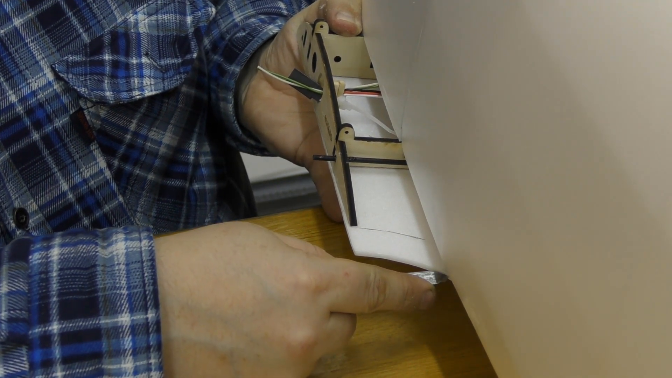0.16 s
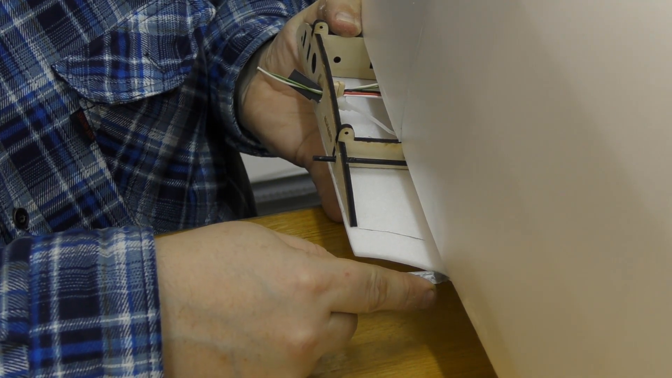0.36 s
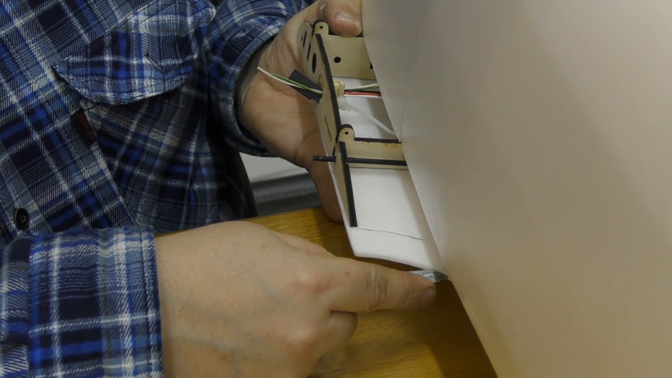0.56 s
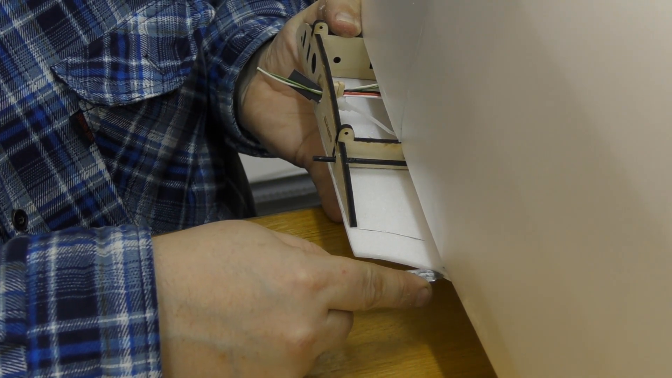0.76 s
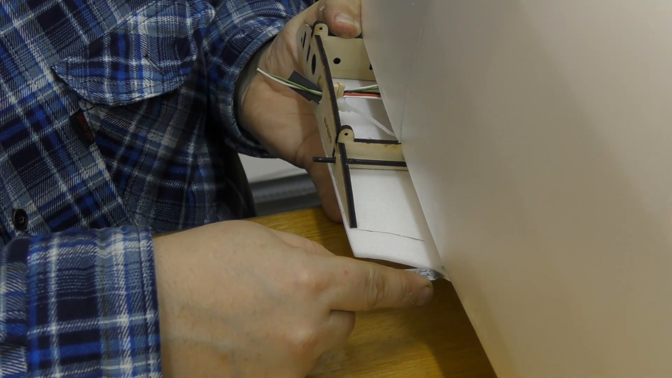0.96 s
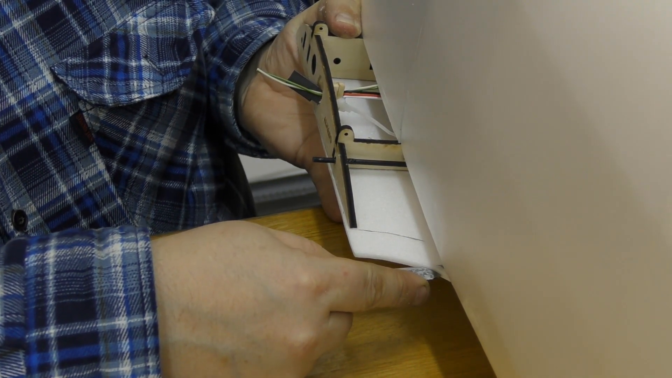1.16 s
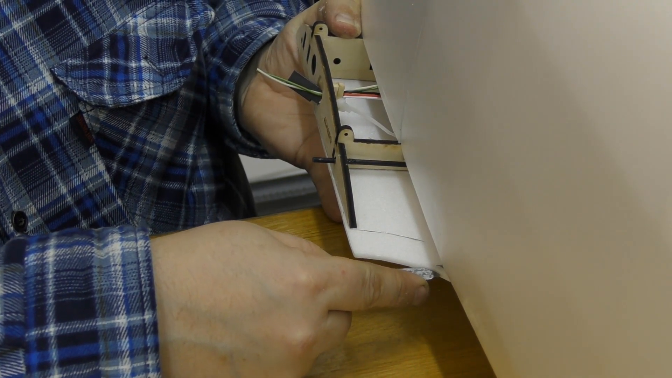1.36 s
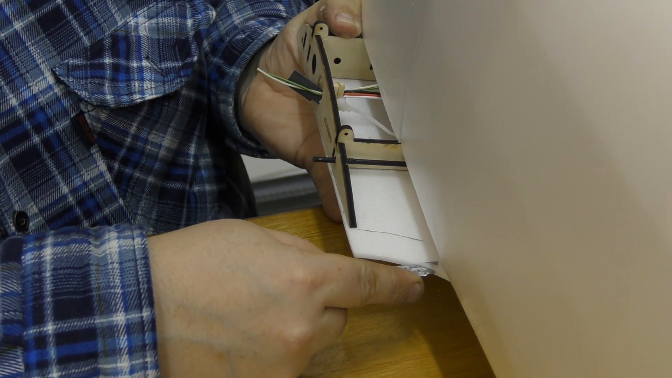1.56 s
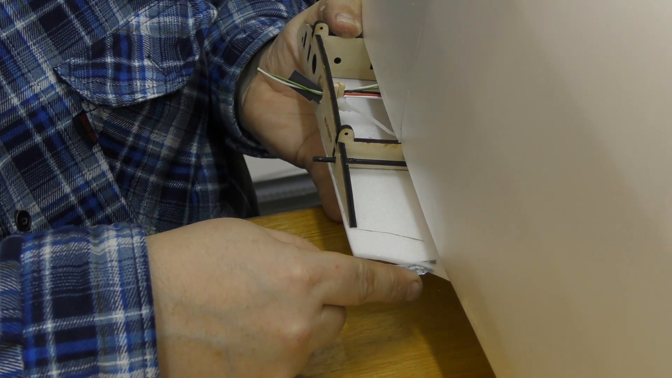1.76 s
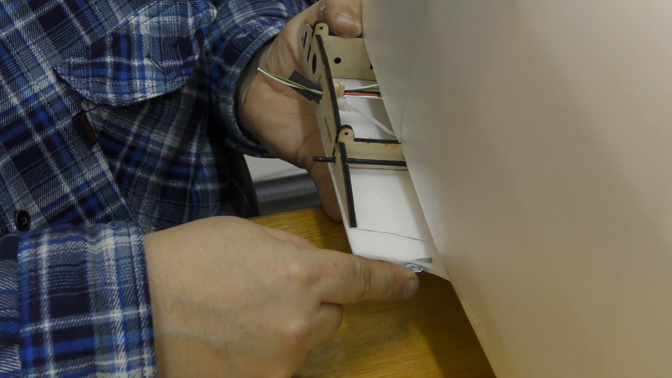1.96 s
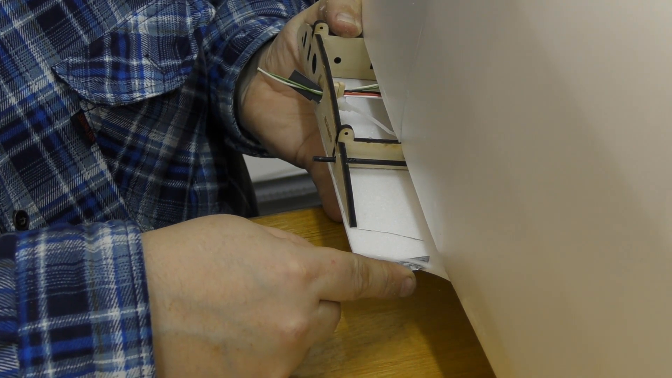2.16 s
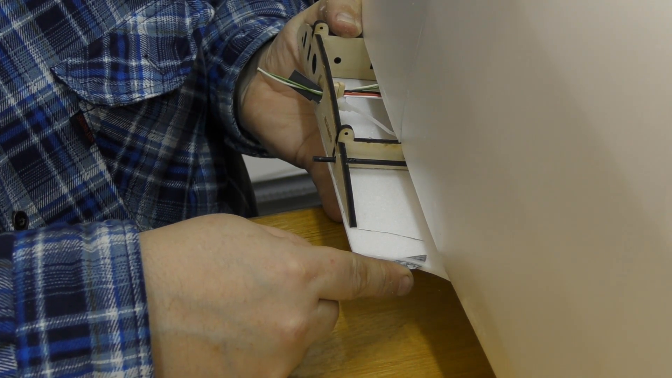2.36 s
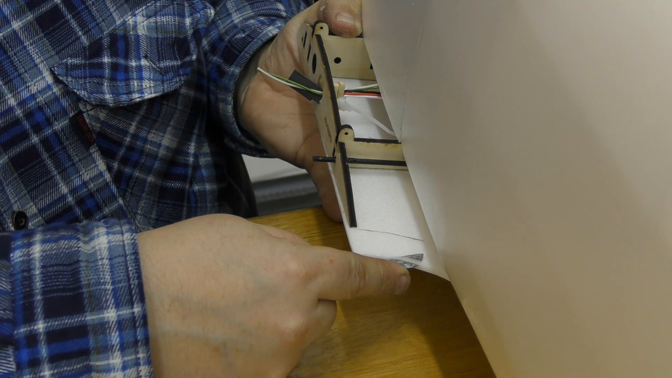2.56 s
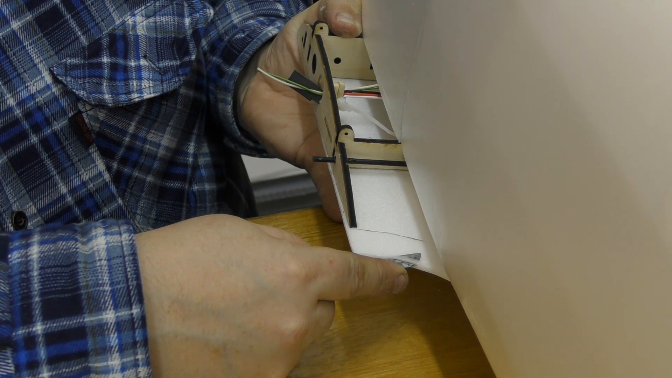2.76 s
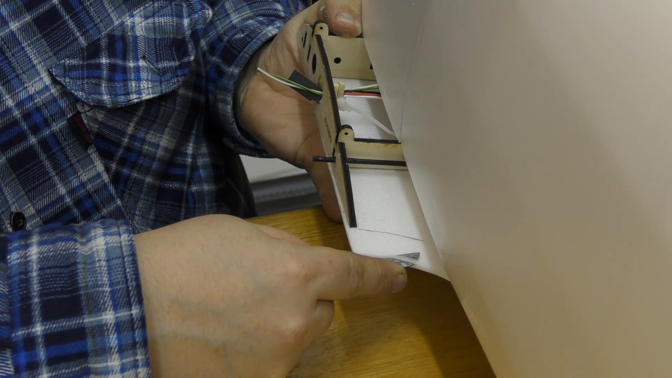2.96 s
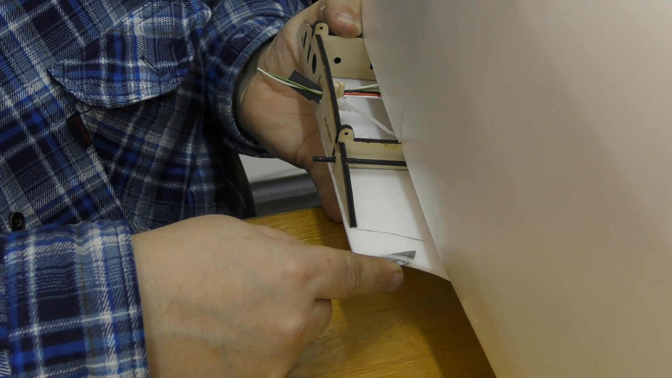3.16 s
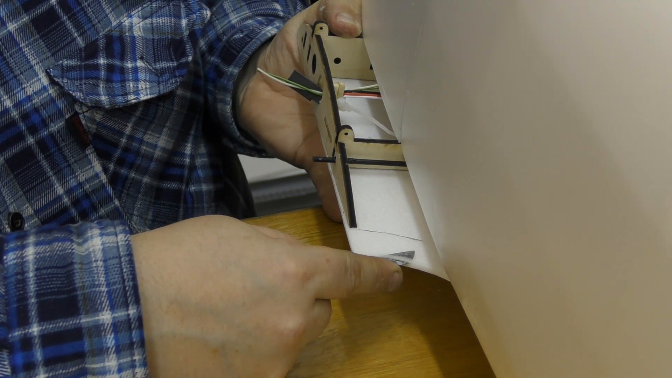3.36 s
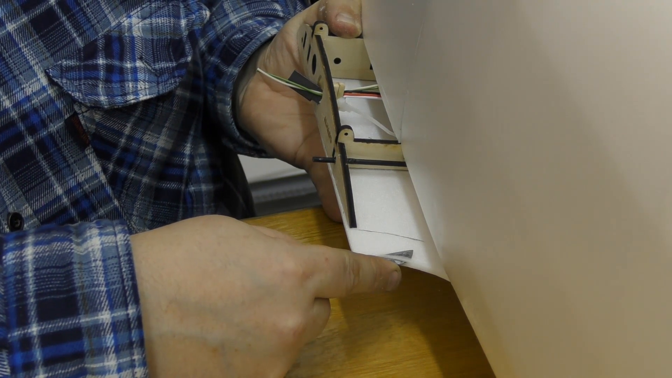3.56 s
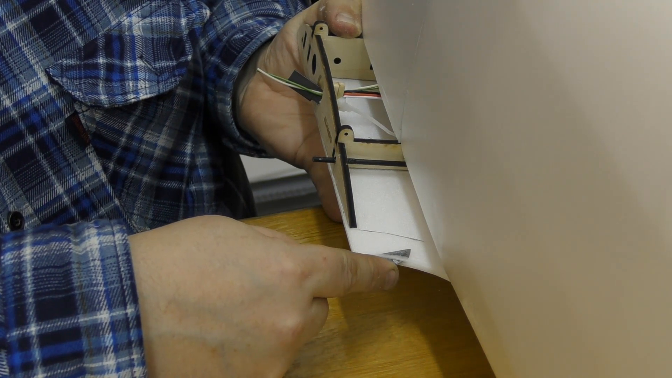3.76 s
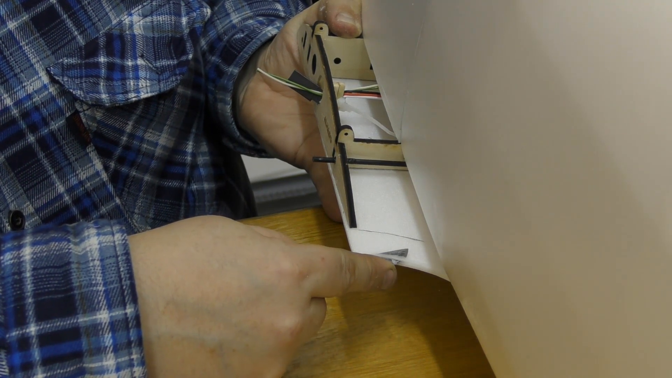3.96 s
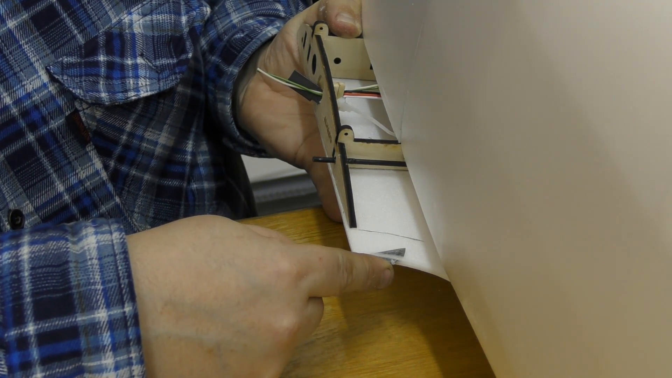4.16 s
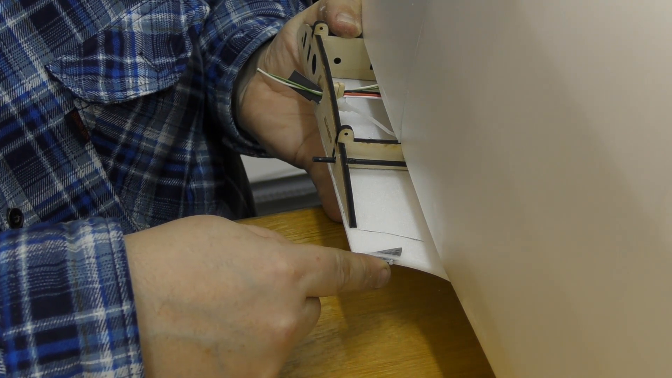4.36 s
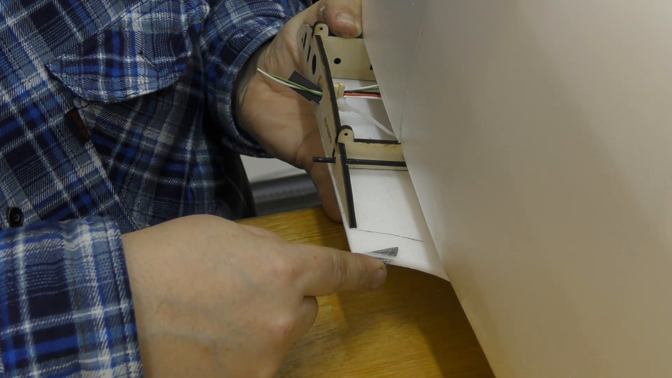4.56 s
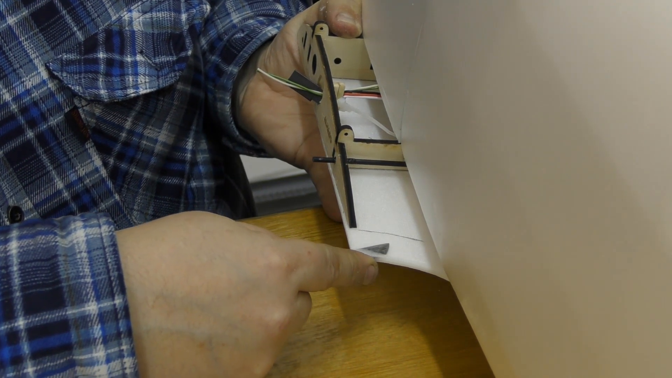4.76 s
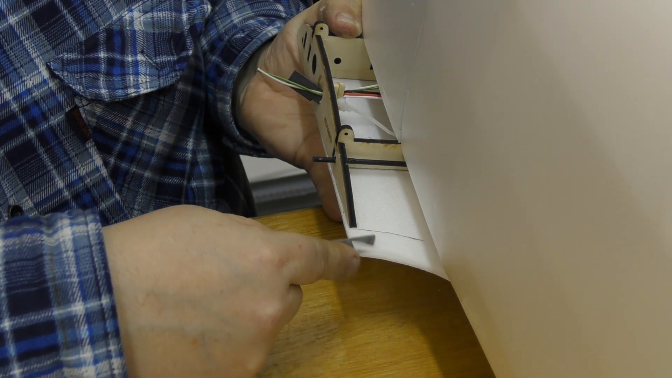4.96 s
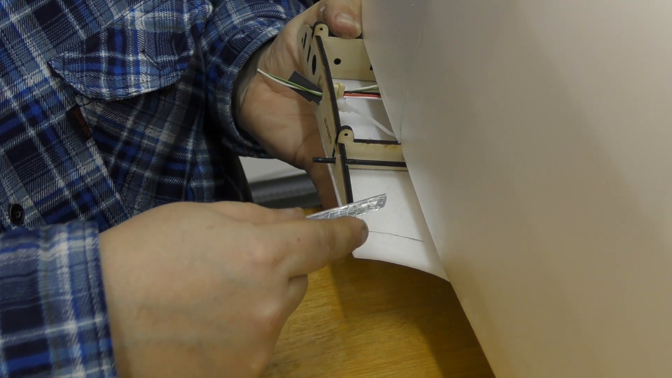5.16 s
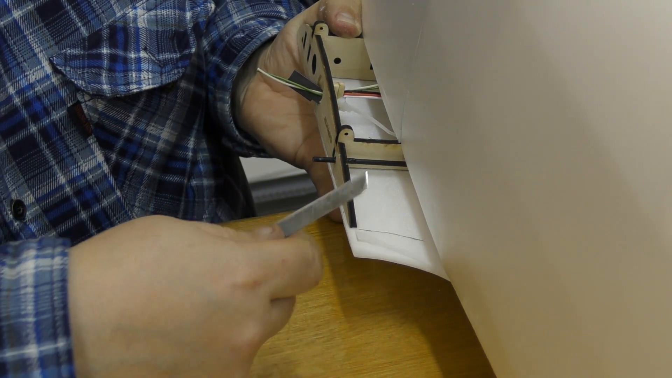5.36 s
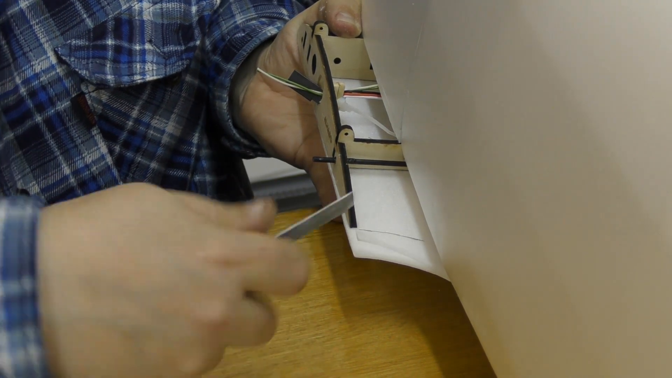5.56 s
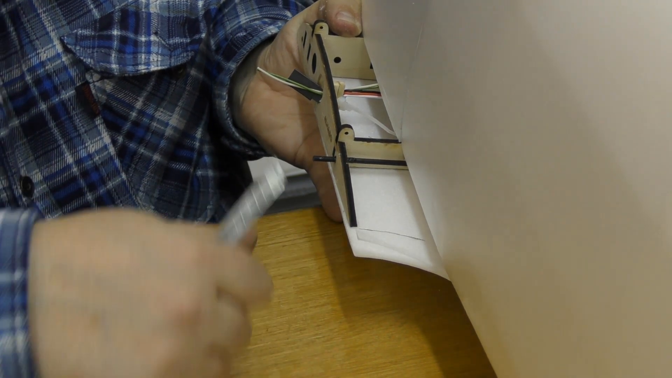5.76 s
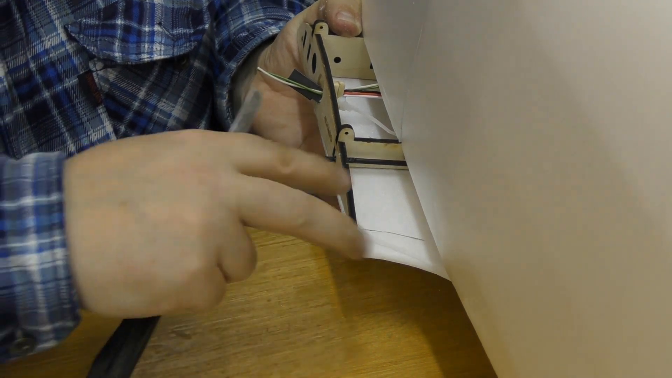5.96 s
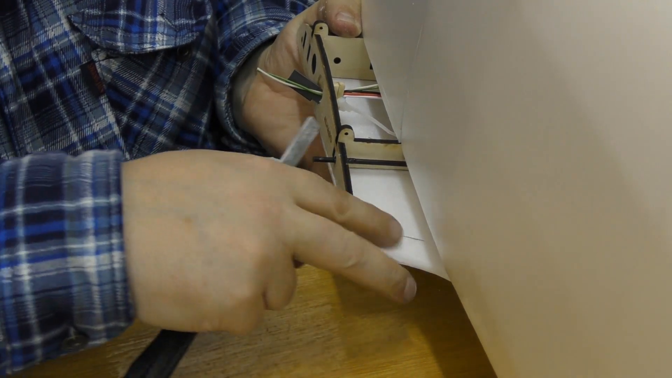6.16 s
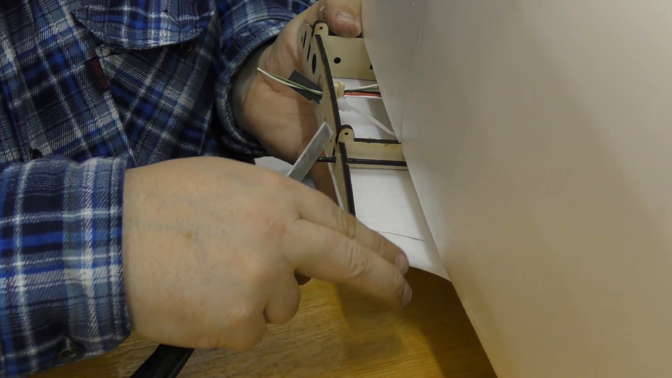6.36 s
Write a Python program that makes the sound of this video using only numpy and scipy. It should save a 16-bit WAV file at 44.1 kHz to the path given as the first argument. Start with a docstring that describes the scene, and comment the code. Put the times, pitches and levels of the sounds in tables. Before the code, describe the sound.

Close up in a quiet, dry indoor room with low rumble and light hiss, a small steel blade slowly trims foam. Faint crunchy pushes and tiny irregular ticks come first, with one sharper woody knock. After a sparse stretch, a brief chattering rasp swells and snaps, then the last strip tears with a very short, bright rip and squeak. Soft low hand bumps and another light knock follow.

```python
"""A small steel blade trims the edge of a foam sheet over a workbench, amid room rumble, a low drone and hiss.
At first it creeps in soft pushes and faint slips: random cell ruptures excite modes of sheet, skin and blade.
Hands add low bumps of filtered noise; two knocks ring a wooden frame; decaying sines ping as the blade springs free.
Late on, the blade runs out in one longer, chattering rasp, with clicks as single cells pop.
Soon after, a dense volley of ruptures rips the last strip, with a short squeak; a few slips and pushes follow."""
import sys
import numpy as np
from scipy import signal
from scipy.fft import rfft, irfft
from scipy.io import wavfile
from scipy.ndimage import uniform_filter1d

SR = 44100
rng = np.random.default_rng(int(sys.argv[2]) if len(sys.argv) > 2 else 0)


def to_wav(sig):
    """Store sig (one row per channel, or 1-D mono) as 16-bit WAV at the path in sys.argv[1].

    Samples outside -1..1 are clipped; the rate is SR.
    """
    pcm = np.clip(np.atleast_2d(sig), -1, 1) * 32767
    pcm = np.round(pcm).astype(np.int16)
    wavfile.write(sys.argv[1], SR, pcm.T)  # frames by channels


N = 283198
TIME = np.arange(N) / SR

# Room rumble and microphone hiss. Each row: frequency in Hz, relative spectral level in dB.
FLOOR_SPECTRUM = [(4.7, -31), (8.0, 5), (55, -8.5), (134, -10), (157, -11), (278, -14), (433, -15.5),
                  (491, -16), (868, -17), (1490, -18.5), (1640, -18.5), (2990, -19), (15500, -20)]
# Faint noise that differs slightly between the two channels. Each row: frequency in Hz, relative spectral level
# in dB.
CHANNEL_NOISE_SPECTRUM = [(20, 3.5), (150, 2.5), (1000, -14.5), (5000, -36), (12000, -19.5), (16000, -37)]
# Low drone of the room. Each row: frequency in Hz, bandwidth in Hz, relative level in dB.
DRONE_MODES = [(49, 9, 0)]
FLOOR_DB, DRONE_DB, CHANNEL_NOISE_DB = -59.5, -70.5, -86.5   # rms levels

# Bending modes of the foam sheet. Each row: frequency in Hz, bandwidth in Hz, relative level in dB before any tilt.
SHEET_MODES = [(300.7, 39, -4), (350.5, 40, -2), (387, 32, -2.5), (452, 62, -8.5), (548.3, 37.3, -0.5),
               (646.5, 30, -3), (764, 58, -4.5), (816, 50, 0.5), (875, 46, -0.5), (1021, 87, -7.5)]
# Short rings of its stiff skin. Each row: frequency in Hz, bandwidth in Hz, relative level in dB before any tilt.
SKIN_MODES = [(1214, 133, -1.5), (1513, 105, -1.5), (1706, 48, 0), (2115, 200, -7.5), (2400, 53, -3.5),
              (2557, 50, -1), (2856, 120, -3.5), (3124, 160, -3.5), (3500, 200, -10)]
# Resonances of the blade in the cut. Each row: frequency in Hz, bandwidth in Hz, relative level in dB before tilt.
BLADE_MODES = [(4140, 730, -10.5), (4994, 120, -0.5), (5310, 120, -1.5), (5790, 220, -0.5), (6380, 310, -4),
               (6900, 200, -2), (7900, 460, -2), (8970, 350, 1.5), (9750, 470, -1), (10800, 700, -3),
               (12140, 900, -5.5), (13200, 800, -8), (15000, 1400, -16.5)]
BLADE_TOP_HZ = 14700   # low-pass corner of the foam's damping

# Slow pushes of blade or fingers along the foam. Each row: hardest moment in seconds, length in seconds,
# peak effort in dB, sheet brightness in dB per octave.
PUSHES = [(0.12, 0.15, -65, -7), (0.485, 0.15, -64, 1), (0.818, .19, -54.5, -5), (1.213, 0.16, -60, -9),
          (1.554, 0.23, -56, -4.5), (1.903, 0.4, -61, -9), (2.074, 0.21, -63, -7), (2.63, 0.24, -65, 0),
          (3.208, 0.16, -57, -7), (3.716, 0.13, -59, -3.5), (4.517, 0.31, -64, -2), (4.89, .24, -58.5, 1),
          (5.025, 0.15, -55, 7), (5.079, .062, -44.5, 10), (5.812, .05, -57, -2), (6.307, .14, -62, 9)]
PUSH_RISE_SHARE = 0.51   # part of a push spent building up
PUSH_FLEX_DB, PUSH_SKIN_DB, PUSH_BLADE_DB = -3.0, -7.5, -7.0   # relative to the effort
REST_DB, REST_FULL_S = -72, 0.37   # effort of the edge resting in the cut; when it is fully there

# Slips of the blade and small touches on the sheet. Each row: start in seconds, level of the blade tick in dB,
# length in seconds, sheet brightness in dB per octave.
SLIPS = [(0.07, -51.5, .003, 5), (0.242, -49.5, 0.0047, 2), (0.578, -54, 0.0028, -1),
         (0.753, -35.5, 0.0058, 11), (0.924, -54.5, 0.0048, 0), (1.176, -50.5, .0025, 0),
         (1.246, -57, 0.0084, -16), (1.495, -53.5, .004, -1), (1.554, -44, 0.0068, -5),
         (2.006, -44, 0.0042, -3.5), (2.022, -48.5, .005, 1), (2.068, -55, 0.0053, -10),
         (2.589, -55.5, .0035, -7), (3.056, -52, .0055, -9), (3.115, -56, .009, -1),
         (3.162, -45.5, 0.0048, -6), (3.222, -51.5, 0.0068, 5), (3.2405, -43.5, 0.0034, -2),
         (3.4, -53.5, .0028, -5), (3.519, -52, 0.0027, -5), (4.499, -52.5, .007, -3),
         (4.6565, -44, .0015, -4), (4.72, -41, 0.0025, -18), (4.757, -39, .0018, 5), (4.767, -41, .0012, 0),
         (4.776, -43, .0013, 1), (4.7935, -28, .0018, 6), (4.799, -34, 0.0022, -9),
         (4.931, -51.5, 0.0047, 1), (5.049, -47, 0.0067, 10), (5.0847, -30.5, 0.0023, 5),
         (5.209, -53, 0.0022, 11), (5.7872, -38.5, 0.0064, -5), (6.322, -60.5, .01, 11)]
TYPICAL_SLIP_S = 0.0046
SLIP_FLEX_DB, SLIP_CRUNCH_DB = -7.5, -8.5   # sheet and skin in a typical slip, relative to the blade tick
FLEX_DB_PER_DOUBLING, CRUNCH_DB_PER_DOUBLING = 4.5, 5   # a longer slip moves more of the sheet
THUD_DB, THUD_BAND_HZ = -14.5, (70, 190)   # each slip jogs the held work: dull thud, relative to the sheet's ring

ROOM_T60_S = 0.16   # time for the echoes to decay by 60 dB

# Soft bumps of the hands on the work. Each row: time in seconds, level in dB before a common trim,
# centre frequency in Hz.
BUMPS = [(0.6, -58, 50), (2.121, -57, 55.4), (3.225, -48, 49.5), (4.801, -46.5, 62), (4.883, -52, 52),
         (4.98, -51, 48), (5.121, -48, 59), (5.24, -54, 40), (5.631, -47.5, 63), (5.81, -51, 75),
         (6.061, -43.5, 36.2)]
BUMP_CYCLES, BUMP_TRIM_DB = 3.3, -3.5   # length in cycles of the centre frequency; common trim

# Sharp knocks that reach the frame. Each row: start in seconds, level in dB, brightness in dB per octave.
KNOCKS = [(0.7542, -41, 5), (5.7879, -43.5, -1)]
# Modes of the light wooden frame. Each row: frequency in Hz, bandwidth in Hz, relative level in dB before tilt.
FRAME_MODES = [(196, 21, -0.5), (347, 25, -5), (467, 15, 0), (897, 29, -6), (1270, 130, 0), (1434, 38, 7.5),
               (1950, 190, -2.5)]
# Thin pings as the blade springs free. Each row: start in seconds, frequency in Hz, starting peak level in dB,
# 60 dB decay time in seconds.
PINGS = [(1.554, 3460, -47.5, 0.047), (2.007, 3436, -54, 0.11), (5.208, 4540, -52, 0.034)]

# The long rasp: effort builds steadily in dB, then gives way.
RASP_PEAK_S, RASP_RISE_DB_PER_S, RASP_FALL_DB_PER_S = 4.80, 118, 257
RASP_FLEX_DB, RASP_SKIN_DB, RASP_BLADE_DB = -43, -51, -42   # before the force flare and effort are applied
RASP_SLOPE_DB = -1   # sheet brightness per octave
RASP_BLADE_FOLLOWS = 1.3   # dB of blade rasp per dB of effort
# Crisp pop of a single cell at the tip. Each row: frequency in Hz, bandwidth in Hz, relative level in dB.
POP_MODES = [(9400, 680, 0), (11900, 2300, -2), (13200, 900, -10)]
POP_DB = -1.5   # relative to the blade rasp

# The last strip rips: the tear runs from the blade into the sheet.
RIP_S, RIP_HOLD_S = 5.0915, 0.017
RIP_RISE_DB_PER_S, RIP_FALL_DB_PER_S, RIP_FLEX_FALL_DB_PER_S = 1154, 1900, 1050
RIP_BLADE_DB, RIP_SKIN_DB, RIP_FLEX_DB = -28, -34, -32   # loudest short-time rms
RIP_SLOPE_DB = 6.5   # sheet brightness per octave
RIP_SKIN_LAG_S, RIP_FLEX_LAG_S = 0.0041, 0.0018
RIP_WEAK_BAND_HZ, RIP_WEAK_DB = (3000, 4500), -6.5   # blade and skin modes in this band ring less

SQUEAK_S, SQUEAK_LENGTH_S, SQUEAK_HZ, SQUEAK_DB = 5.0915, 0.013, 813, -24.5
CUTOFF_HZ = 15850


def from_db(db):
    """Amplitude ratio: 20 dB per factor of ten."""
    return 10 ** (np.asarray(db) / 20)


def rms_one(x):
    """Normalise to unit root mean square."""
    return x / np.sqrt(np.mean(x ** 2) + 1e-20)


def crest_one(x, window_s):
    """Normalise a short sound so that its loudest moment has unit short-time rms."""
    power = uniform_filter1d(x * x, max(2, int(window_s * SR)))
    return x / np.sqrt(power.max() + 1e-20)


def add(track, s, sound):
    """Superpose a sound on the track at time s."""
    start = max(0, round(s * SR))
    track[start:start + len(sound)] += sound[:N - start]


def swell(length_s):
    """Times and heights of a sine-squared window: one smooth rise and fall."""
    t = np.arange(int(length_s * SR)) / SR
    return t, np.sin(np.pi * t / length_s) ** 2


def filtered(x, order, hz, kind):
    """Butterworth filtering: a maximally flat passband."""
    return signal.sosfilt(signal.butter(order, hz, kind, fs=SR, output="sos"), x)


def resonate(force, modes):
    """Modal superposition: parallel two-pole resonances with alternating signs."""
    out = 0
    for k, (hz, width, db) in enumerate(modes):
        radius = np.exp(-np.pi * abs(width) / SR)   # a wider resonance decays sooner
        poles = [1, -2 * radius * np.cos(2 * np.pi * hz / SR), radius * radius]
        gain = (-1) ** k * from_db(db) * (1 - radius * radius) / 2
        out = out + gain * signal.lfilter([1, 0, -1], poles, force + 1e-18)
    return out


def tilted(modes, slope_db, top_hz):
    """Selective excitation: the edge's bearing decides whether low modes or those from top_hz up answer."""
    return [(hz, width, db + slope_db * np.log2(min(hz / top_hz, 1))) for hz, width, db in modes]


def coloured_noise(spectrum):
    """Spectral shaping: white noise weighted along log frequency, at unit rms."""
    hz = np.maximum(np.arange(N // 2 + 1) * SR / N, 1)
    points_hz, points_db = np.transpose(spectrum)
    weights_db = np.interp(np.log(hz), np.log(points_hz), points_db)
    return rms_one(irfft(rfft(rng.standard_normal(N)) * from_db(weights_db), N))


def background():
    """Stationary noise: smooth rumble and hiss, with a narrow noise band as a wavering drone."""
    drone = rms_one(resonate(rng.standard_normal(N), DRONE_MODES))
    return from_db(FLOOR_DB) * coloured_noise(FLOOR_SPECTRUM) + from_db(DRONE_DB) * drone


def channel_noise():
    """Incoherent noise: each channel draws its own faint noise, so the two sides differ slightly."""
    return from_db(CHANNEL_NOISE_DB) * np.array([coloured_noise(CHANNEL_NOISE_SPECTRUM) for channel in range(2)])


def snaps(count, per_s, spread_db):
    """Random impulse excitation: foam cells break at random moments with uneven force and either sign."""
    sizes = from_db(spread_db * np.minimum(rng.exponential(1, count), 4)) * rng.choice([-1, 1], count)
    return sizes * (rng.random(count) < per_s / SR)


def sheet(force, slope_db):
    """Weak radiation below the lowest mode: the sheet's modes pass a high-pass filter."""
    ringing = resonate(force, tilted(SHEET_MODES, slope_db, top_hz=800))
    return filtered(ringing, 5, 280, "high")


def blade(force, slope_db):
    """Damping: the foam around the edge softens the blade's highest rings."""
    ringing = resonate(force, tilted(BLADE_MODES, slope_db, top_hz=11000))
    return filtered(ringing, 1, BLADE_TOP_HZ, "low")


def drag():
    """Continuous fracture: between slips the edge tears fine cells; each push swells and relaxes."""
    # the edge settles into the cut and rests there until the strip rips
    effort = from_db(REST_DB) * np.interp(TIME, [0, REST_FULL_S], [0, 1]) * (TIME < RIP_S)
    for s, length_s, db, _ in PUSHES:
        start_s = s - PUSH_RISE_SHARE * length_s
        triangle = np.interp(TIME, [start_s, s, start_s + length_s], [0, 1, 0])
        effort = effort + from_db(db) * triangle ** 1.26
    s, _, _, slopes_db = np.transpose(PUSHES)
    bright = np.clip(0.5 + np.interp(TIME, s, slopes_db) / 18, 0, 1)   # share of the bright bearing point
    force = snaps(N, per_s=2200, spread_db=3.8)
    dull_flex = rms_one(sheet(force, slope_db=-7.5))
    bright_flex = rms_one(sheet(force, slope_db=10))
    flex = from_db(PUSH_FLEX_DB) * (dull_flex * (1 - bright) + bright_flex * bright)
    crunch = from_db(PUSH_SKIN_DB) * rms_one(resonate(force, SKIN_MODES))
    steel = from_db(PUSH_BLADE_DB) * rms_one(blade(force, slope_db=1.0))
    return effort * (flex + crunch + steel)


def slip_force(count, length_s, first_snap):
    """Impulse and aftershocks: a firm snap sets off a dying volley, which outweighs it in a long slip."""
    decay = np.exp(-(np.arange(count) / SR / length_s) ** 2)
    force = snaps(count, per_s=14000, spread_db=2.0) * decay
    force[0] = first_snap
    return force


def slips():
    """Common excitation: the edge jumps and strikes sheet, skin and blade; short jumps ring the blade brightest."""
    out, count = np.zeros(N), SR // 7
    for s, db, length_s, slope_db in SLIPS:
        doublings = np.log2(length_s / TYPICAL_SLIP_S)
        flex_db = db + SLIP_FLEX_DB + FLEX_DB_PER_DOUBLING * doublings
        crunch_db = db + SLIP_CRUNCH_DB + CRUNCH_DB_PER_DOUBLING * doublings
        blade_slope_db = 3.0 * np.log2(0.007 / length_s)
        jolt = slip_force(count, length_s, first_snap=8.0)     # the sheet feels mostly the first jolt
        volley = slip_force(count, length_s, first_snap=5.0)   # the edge feels every cell
        flex = from_db(flex_db) * crest_one(sheet(jolt, slope_db), window_s=0.01)
        crunch = from_db(crunch_db) * crest_one(resonate(jolt, SKIN_MODES), window_s=0.00385)
        tick = from_db(db) * crest_one(blade(volley, blade_slope_db), window_s=0.00098)
        thud = from_db(flex_db + THUD_DB) * crest_one(filtered(jolt, 2, THUD_BAND_HZ, "band"), window_s=0.01)
        add(out, s, flex + crunch + tick + thud)
    return out


def room(x, wet_db, dull_hz, delay_s):
    """Reverberation: bench and walls return decaying, low-passed echoes, by convolution."""
    t = np.arange(SR // 2) / SR
    echoes = rng.standard_normal(len(t)) * from_db(-60 * t / ROOM_T60_S) * (t > delay_s)
    echoes = filtered(echoes / np.linalg.norm(echoes), 1, dull_hz, "low")
    return from_db(wet_db) * signal.fftconvolve(x, echoes)[:N]


def bumps():
    """Narrow-band forcing: soft hands push the work through a few slow, uneven cycles."""
    out = np.zeros(N)
    for s, db, hz in BUMPS:
        length_s = BUMP_CYCLES / hz
        t, push = swell(length_s)
        shove = np.r_[push * rng.standard_normal(len(t)), np.zeros(SR // 10)]   # silence lets the filter ring out
        thud = filtered(shove, 3, [0.4 * hz, 1.39 * hz], "band")
        add(out, s - 0.94 * length_s, from_db(db + BUMP_TRIM_DB) * crest_one(thud, window_s=0.025))
    return out


def knocks():
    """Impulse response: a hard touch sets the light frame ringing."""
    out = np.zeros(N)
    for s, db, slope_db in KNOCKS:
        ringing = resonate(signal.unit_impulse(SR // 5), tilted(FRAME_MODES, slope_db, top_hz=895))
        add(out, s, from_db(db) * crest_one(ringing, window_s=0.0052))
    return out


def pings():
    """Free vibration: the thin steel rings on in one exponentially decaying mode."""
    out, t = np.zeros(N), np.arange(SR // 6) / SR
    for s, hz, db, t60 in PINGS:
        add(out, s, from_db(db - 60 * t / t60) * np.sin(2 * np.pi * hz * t))
    return out


def ramp_db(start_s, hold_s, rise_db_per_s, fall_db_per_s):
    """Exponential growth and decay, linear in dB: climbs to 0 at start_s, holds, then falls."""
    rise_db = rise_db_per_s * (TIME - start_s)
    fall_db = fall_db_per_s * (start_s + hold_s - TIME)
    return np.minimum(0, np.minimum(rise_db, fall_db)).clip(-200)


def chatter(per_s, depth):
    """Stick-slip at uneven intervals: returns a force envelope flaring at each release, and one click for each."""
    releases = np.cumsum(rng.gamma(5, 1 / (5 * per_s), N // 100))
    phase = np.interp(TIME, releases, np.arange(len(releases))) % 1   # progress from one release to the next
    clicks = (np.diff(phase, prepend=0) < 0) * from_db(3.3 * rng.standard_normal(N))
    flare = 1 - depth * (1 - np.exp(-4 * phase))
    return flare, clicks


def rasp():
    """Modulated fracture: the blade chatters out and pops cells; its rasp grows faster than the sheet's sound."""
    effort_db = ramp_db(RASP_PEAK_S, 0, RASP_RISE_DB_PER_S, RASP_FALL_DB_PER_S)
    flare, clicks = chatter(per_s=150, depth=0.68)
    force = flare * snaps(N, per_s=3500, spread_db=2.5)
    flex = from_db(RASP_FLEX_DB) * rms_one(sheet(force, RASP_SLOPE_DB))
    crunch = from_db(RASP_SKIN_DB) * rms_one(resonate(force, SKIN_MODES))
    steel = rms_one(blade(force, slope_db=-1.0)) + from_db(POP_DB) * rms_one(resonate(clicks, POP_MODES))
    steel_db = RASP_BLADE_DB + RASP_BLADE_FOLLOWS * effort_db
    return from_db(effort_db) * (flex + crunch) + from_db(steel_db) * steel


def rip():
    """Dense rupture: the last strip parts in one volley; skin and sheet answer later, the sheet shaking longer."""
    force = snaps(N, per_s=14000, spread_db=1.1)

    def volley(lag_s, fall_db_per_s):
        """Envelope shaping: cells break through the rise, hold and fall of the tear."""
        return force * from_db(ramp_db(RIP_S + lag_s, RIP_HOLD_S, RIP_RISE_DB_PER_S, fall_db_per_s))

    def weakened(modes):
        """Reduced modal response within the weak band."""
        low, high = RIP_WEAK_BAND_HZ
        return [(hz, width, db + RIP_WEAK_DB * (low < hz < high)) for hz, width, db in modes]

    steel = tilted(weakened(BLADE_MODES), slope_db=-3.0, top_hz=15000)
    skin = tilted(weakened(SKIN_MODES), slope_db=3.0, top_hz=2520)
    tick = resonate(volley(0, RIP_FALL_DB_PER_S), steel)
    crunch = resonate(volley(RIP_SKIN_LAG_S, RIP_FALL_DB_PER_S), skin)
    flex = sheet(volley(RIP_FLEX_LAG_S, RIP_FLEX_FALL_DB_PER_S), RIP_SLOPE_DB)
    layers = (RIP_BLADE_DB, tick), (RIP_SKIN_DB, crunch), (RIP_FLEX_DB, flex)
    return sum(from_db(db) * crest_one(layer, window_s=0.022) for db, layer in layers)


def squeak():
    """Stick-slip locked near the sheet's strongest mode: a few cycles of a sine, which also ring the sheet."""
    out = np.zeros(N)
    t, grip = swell(SQUEAK_LENGTH_S)
    add(out, SQUEAK_S, grip * np.sin(2 * np.pi * SQUEAK_HZ * t))
    return from_db(SQUEAK_DB) * crest_one(out + 0.3 * resonate(out, SHEET_MODES), window_s=0.0083)


def scene():
    """Superposition: both channels share one sum of sources and echoes, and differ only by a faint independent
    noise."""
    work = drag() + slips() + knocks() + pings() + rasp() + rip() + squeak()
    echoes = room(work, wet_db=-10.5, dull_hz=4030, delay_s=0.0059)
    return background() + work + echoes + bumps() + channel_noise()


def record(dry):
    """Band limitation: a steep linear-phase low-pass filter cuts the top."""
    lowpass = signal.firwin(601, CUTOFF_HZ, fs=SR, window="blackman")
    return signal.fftconvolve(dry, lowpass[None], "same", axes=1)


dry = scene()
out = record(dry)
to_wav(out)
```